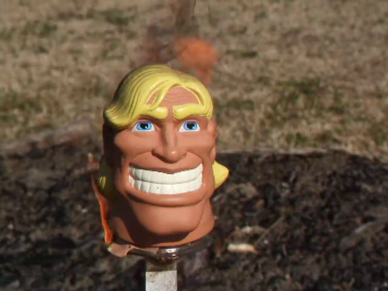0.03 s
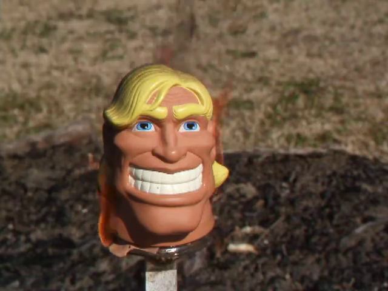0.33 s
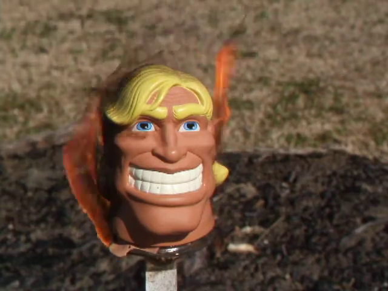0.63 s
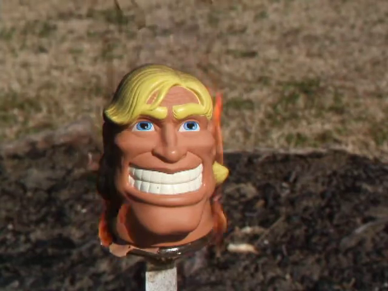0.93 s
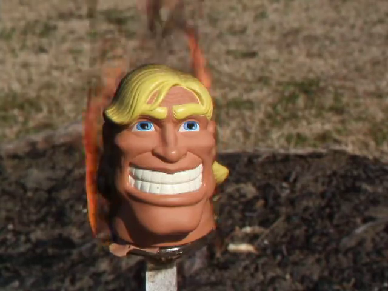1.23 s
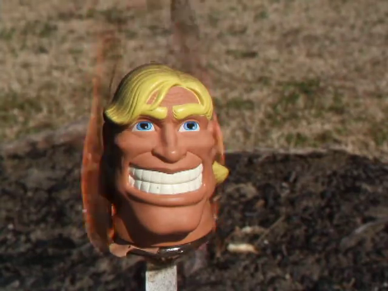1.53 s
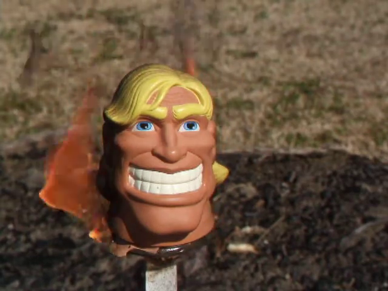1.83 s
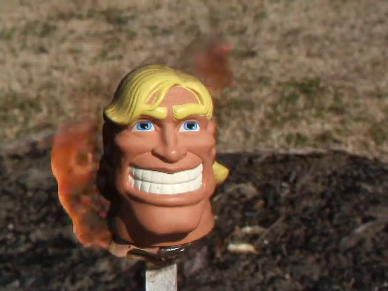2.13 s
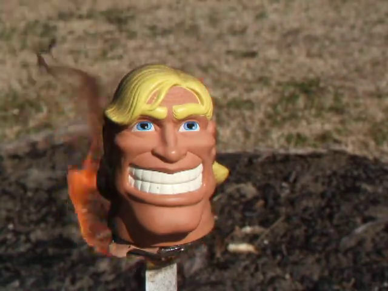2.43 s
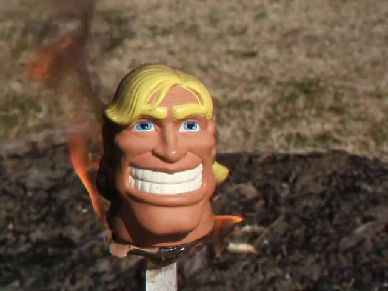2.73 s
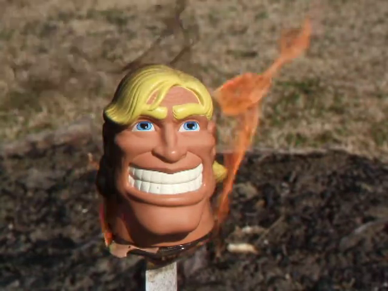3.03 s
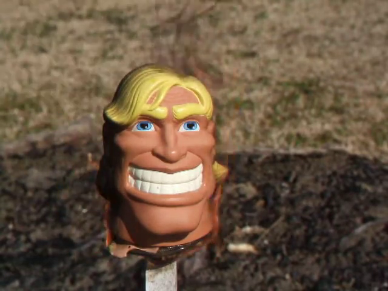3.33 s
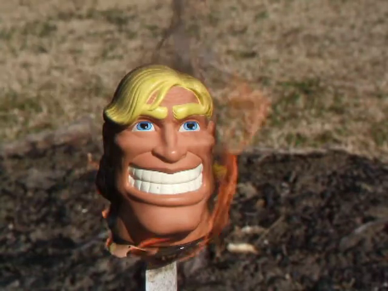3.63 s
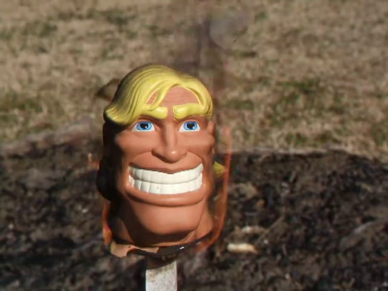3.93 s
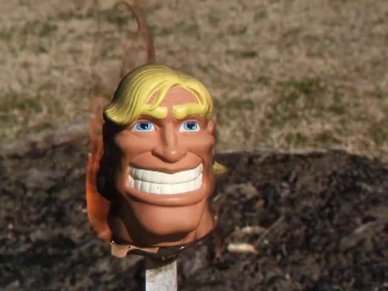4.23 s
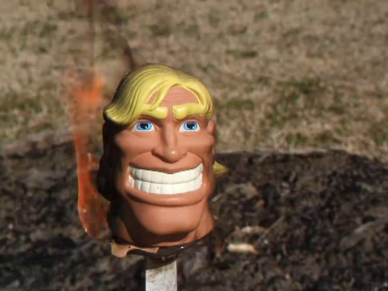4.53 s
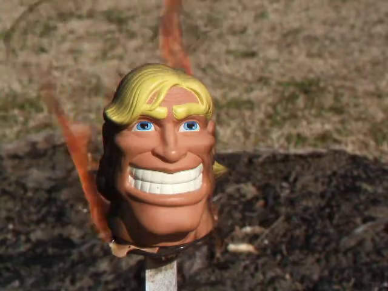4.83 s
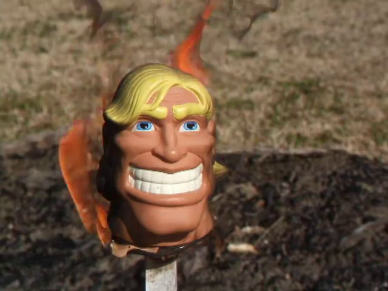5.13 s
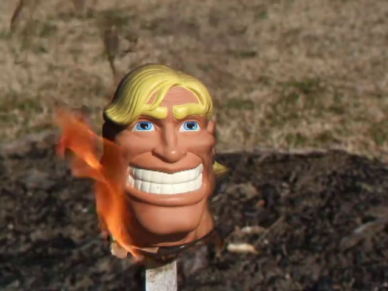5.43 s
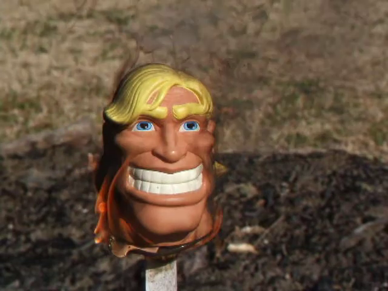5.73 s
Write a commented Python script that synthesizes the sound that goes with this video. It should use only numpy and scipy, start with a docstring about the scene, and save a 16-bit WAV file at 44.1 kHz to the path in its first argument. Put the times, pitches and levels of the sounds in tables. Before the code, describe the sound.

Burning plastic crackles finely outdoors, with irregular dry pops and brief sputters over a steady, slightly gritty hiss.

```python
"""A plastic head burning outdoors

The head burns on a post, close to a small camera whose coarse sampling adds grit. Gas bubbles burst
in the melt as dry pops over a fine crackle, and now and then the melt sputters and fizzes.
Behind it lie an open-air hiss, light wind, the drone of a far machine and a few faint chirps."""
import sys
import numpy as np
from scipy import signal
from scipy.fft import rfft, irfft
from scipy.io import wavfile
from scipy.ndimage import uniform_filter1d

SR = 44100
rng = np.random.default_rng(int(sys.argv[2]) if len(sys.argv) > 2 else 0)


def master(y):
    """Save y as 16-bit WAV."""
    cut = np.clip(np.atleast_2d(y).T, -1, 1)
    pcm = np.round(cut * 32767)  # scale
    wavfile.write(sys.argv[1], SR, pcm.astype(np.int16))


N = 263718
TIME = np.arange(N) / SR

# tone of the open air, a hiss over a low rumble: frequency_hz, relative_db
AIR_TONE = [(10, -9.5), (24, 0), (52, -.5), (80, -4), (135, -6.5), (200, -13), (310, -17), (460, -16),
            (620, -20), (1000, -19), (1600, -19.5), (2300, -22), (4000, -28), (8000, -33)]
# gusts of wind on the microphone: peak_s, half_width_s, level_db
WIND_GUSTS = [(1.705, 0.044, -41.5), (2.95, 0.19, -55.5)]
# steady notes of the far machine: pitch_hz, level_db
MACHINE_NOTES = [(119.3, -60.5), (180, -66), (221, -69.5), (238.5, -68), (274, -71), (360, -77),
                 (712.5, -71)]
# swells of one more machine note, the deepest: peak_s, half_width_s, level_db
MACHINE_SWELLS = [(1.0, .3, -55.5), (3.35, .2, -56.5)]
# faint chirps: start_s, length_s, start_pitch_hz, end_pitch_hz, peak_db
FAINT_CHIRPS = [(2.80, 0.038, 3450, 3940, -57.5), (5.12, .07, 3100, 2500, -58),
                (5.205, .04, 2530, 2490, -55.5)]
# tone of the sound bouncing off the hollow head and its post: frequency_hz, relative_db
ECHO_TONE = [(200, -3), (450, 4.5), (750, -3), (1000, 5.5), (1600, 7), (2500, -10), (3000, 6), (3400, -6),
             (4400, -1.5), (5050, 6.5), (5500, -7.5), (7000, 1.5)]
# tone of a bursting bubble: frequency_hz, relative_db
BUBBLE_TONE = [(100, -30.5), (400, -13.5), (1000, -9.5), (2000, -6), (3500, -1.5), (5000, 0.5), (7300, 4.5),
               (9000, 1.5)]
# tone of the dull knock a large bubble gives the head: frequency_hz, relative_db
KNOCK_TONE = [(80, -8), (250, -2), (500, 1.5), (900, -3.5), (1600, -8), (4000, -24.5)]
# the melt boils up and settles again: start_s, length_s, strength_db (compared with SIMMER_DB)
BOIL_UPS = [(0, .3, -54.5), (0.759, .22, -55), (1.279, .17, -52.5), (1.622, .2, -54), (2.031, .2, -56),
            (2.86, .34, -53), (3.33, .25, -47.5), (3.75, .18, -48.5), (3.94, .22, -43.5),
            (4.868, 0.08, -50.5), (5.435, .2, -52.5), (5.799, .12, -44)]
# quick runs of tiny bubbles, and a few very short dull ones that sound as single pops with body: start_s,
# length_s, level_db, extra_brightness_db_per_octave
SPUTTER_RUNS = [(0.564, 0.0022, -39.5, 0), (0.822, 0.0071, -34.5, 5.5), (0.896, 0.0048, -35.5, -4),
                (1.582, 0.013, -38.5, -4.5), (1.708, 0.0076, -38.5, -3.5), (1.772, 0.0047, -40.5, -8),
                (2.856, 0.0057, -22, 6), (3.127, 0.0054, -34, 2.5), (3.508, 0.055, -38.5, -1),
                (4.065, 0.01, -32.5, -1.5), (4.116, 0.065, -44.5, -.5), (5.429, 0.01, -44.5, -5.5),
                (5.834, 0.0058, -30.5, 5.5), (5.855, 0.029, -39.5, 0)]
# the loudest bursting bubbles: start_s, relative_db, brightness_db_per_octave
BIG_POPS = [(0.0124, -3.5, 2), (.081, -12, 9), (.147, -12, 10), (.3005, -8, 3.5), (.4807, -7.5, 5.5),
            (0.4913, -4, 4), (0.563, -5.5, 0.5), (0.6401, -5.5, 5), (0.9141, -3.5, 10),
            (0.9482, -10.5, 9.5), (0.9721, -8, 6), (1.126, -14.5, 5), (1.1612, -13, 1), (1.3628, -19, 7.5),
            (1.4838, -5.5, 3), (1.6662, -12, 2), (1.7039, -7.5, 6), (1.737, -12.5, 4), (1.7694, -1.5, 8),
            (1.927, -15, 4.5), (1.9777, -11.5, 11), (2.2115, -7.5, 2.5), (2.2159, -5, 6.5),
            (2.2344, -4.5, 3), (2.2894, -13.5, 17.5), (2.4685, -6.5, 8), (2.5209, 2.3, 3.5),
            (2.5785, -11.5, 6), (2.6269, -3.5, 8.5), (2.6849, -6, 7), (2.8774, -5, 3.5),
            (2.8952, -8.5, 6.5), (2.9837, -7.5, 7.5), (3.131, -8.5, 7), (3.2133, -16, 6.5),
            (3.2932, -11.2, 3),         (3.3743, -12, 5), (3.4219, -12, 5), (3.5728, -7, 4),
            (3.6008, -9.5, 3), (3.6732, -15, -1), (3.6839, -12, 9), (3.6941, -9.5, 5), (3.7472, 0.6, 5),
            (3.7832, -7.5, 5.5), (3.8027, -9, 3.5), (3.8414, -8, 9), (3.87, -1, 5.5), (3.927, -8.5, 8),
            (3.949, -6, 5.5), (3.9989, -9, 1.5), (4.026, -5, 9.5), (4.183, -16, -0.5), (4.247, -16.5, -1.5),
            (4.373, -6.5, 4), (4.3992, -9.5, 0.5), (4.4476, -3, 4), (4.5493, -9, 6.5), (4.5872, -6.5, 7.5),
            (4.6255, -10, 7.5), (4.739, -11.5, 3.5), (4.9199, -10.5, 8), (5.0916, 7, 8.5),
            (5.1022, -1.5, 3), (5.2717, -9, 10), (5.4067, -9, 2), (5.5246, -11, 2.5), (5.6212, -10, 1.5),
            (5.704, -7, 7), (5.747, -2, 6), (5.7709, .1, 5), (5.8005, -9.5, 1.5), (5.8375, -1.5, 5.5)]

SIMMER_DB = -56.5  # rough level of the crackle between boil-ups


def undb(db):
    """Turn decibels into a number to multiply by."""
    return 10 ** (np.asarray(db) / 20)


def unit(x):
    """Scale a sound so its average level (rms) is 1."""
    return x / np.sqrt(np.mean(x ** 2) + 1e-18)


def add(out, start_s, sound):
    """Mix a sound in at the given time."""
    i = max(int(round(start_s * SR)), 0)
    out[i:i + len(sound)] += sound[:max(N - i, 0)]


def wander(per_s):
    """A smooth random curve that strays about 1 either side of zero."""
    hold = int(SR / per_s)
    steps = np.repeat(rng.standard_normal(N // hold + 1), hold)
    return 1.3 * uniform_filter1d(uniform_filter1d(steps, hold), hold)[:N]


def swells(rows, rest_db):
    """A volume that rests at one level and rises in bell-shaped swells."""
    return undb(rest_db) + sum(undb(db) * np.exp(-((TIME - s) / width) ** 2) for s, width, db in rows)


def tone_filter(points, tilt_db=0, size=256):
    """Make a filter from a tone table; tilt_db brightens it per octave, pivoting at 5 kHz."""
    hz, db = np.transpose(points)
    octave = np.log2(np.maximum(np.fft.rfftfreq(size, 1 / SR), 10))
    db = np.interp(octave, np.log2(hz), db) + tilt_db * np.clip(octave - np.log2(5000), -3, 1)
    # move the filter's energy to its start, so clicks begin sharply
    cepstrum = irfft(np.log(undb(db)))
    cepstrum[1:size // 2] *= 2
    cepstrum[size // 2 + 1:] = 0
    return irfft(np.exp(rfft(cepstrum)))


def through(x, impulse):
    """Pass a sound through a filter, keeping its length."""
    return signal.oaconvolve(x, impulse)[:len(x)]


def air_and_wind(hiss_db=-49.5, swell_db=1.0, flicker_db=.98, breeze_db=-66):
    """The open air hisses almost evenly, and wind rumbles on the microphone."""
    hiss = unit(through(rng.standard_normal(N), tone_filter(AIR_TONE, size=8192)))
    low_band = signal.butter(2, [28, 75], "band", fs=SR, output="sos")
    wind = unit(signal.sosfilt(low_band, rng.standard_normal(N)))
    hiss_gain = undb(hiss_db + swell_db * wander(1.8) + flicker_db * wander(18))
    return hiss * hiss_gain + wind * swells(WIND_GUSTS, breeze_db)


def far_machine(waver_db=2.0, drift=.006, deep_hz=89.76, deep_rest_db=-63.5, deep_waver_db=1.4):
    """A far drone wavers on its way through moving air; its deepest note swells now and then."""
    def note(pitch_hz):
        hz = pitch_hz * (1 + drift * wander(6))
        return np.sqrt(2) * np.sin(2 * np.pi * np.cumsum(hz) / SR)
    steady = sum(note(hz) * undb(db + waver_db * wander(5)) for hz, db in MACHINE_NOTES)
    deep = note(deep_hz) * swells(MACHINE_SWELLS, deep_rest_db) * undb(deep_waver_db * wander(5))
    return steady + deep


def chirps():
    """Thin whistles slide in pitch, fading softly in and out."""
    out = np.zeros(N)
    for start_s, length_s, start_hz, end_hz, db in FAINT_CHIRPS:
        hz = np.linspace(start_hz, end_hz, int(length_s * SR))
        whistle = np.sin(2 * np.pi * np.cumsum(hz) / SR)
        add(out, start_s, undb(db) * signal.windows.tukey(len(hz), .5) * whistle)
    return out


def echoing_click(scatter_db=-10, scatter_s=.0018, ground_s=.0052, ground_db=-21,
                  tail_db=-21, tail_s=.0072):
    """A click arrives directly, then bounces off the head and the ground and leaves a faint tail."""
    t = TIME[:SR // 20]
    scatter = rng.standard_normal(len(t)) * np.exp(-t / scatter_s) * (t > .0009)
    tail = rng.standard_normal(len(t)) * np.exp(-t / tail_s) * (t > ground_s)
    echo = undb(scatter_db) * scatter / np.linalg.norm(scatter)
    echo += undb(tail_db) * tail / np.linalg.norm(tail)
    echo += undb(ground_db) * np.sinc((t - ground_s) * SR)
    return signal.unit_impulse(len(t)) + through(echo, tone_filter(ECHO_TONE, size=512))


def burst(tilt_db):
    """One bubble bursts with a sharp click, with the echoes of its own spot on the melt."""
    return through(echoing_click(), tone_filter(BUBBLE_TONE, tilt_db))


def bubbles(samples, per_s, spread_db, tilt_db, spots):
    """Bubbles burst at random moments on several spots: many small ones, a few large."""
    out = np.zeros(samples)
    for _ in range(spots):
        hits = rng.random(samples) < per_s / spots / SR
        strength = undb(spread_db * np.minimum(rng.standard_exponential(samples), 3))
        out += through(hits * strength, burst(tilt_db))
    return unit(out)


def boiling(rise_s=.06, fall_s=.025):
    """How hard the melt boils, 1 at a simmer: each boil-up builds, holds and dies quickly."""
    power = np.ones(N)
    for start_s, length_s, db in BOIL_UPS:
        rise = np.clip((TIME - start_s) / rise_s, 0, 1)
        fall = np.exp(-np.maximum(TIME - start_s - length_s, 0) / fall_s)
        power += (undb(db - SIMMER_DB) * rise * fall) ** 2
    return np.sqrt(power)


def crackle(heat, dull_db=-9.5, flicker_db=3.3, growth=.9):
    """The boiling melt crackles finely all the time, in uneven spurts as the flames lick it."""
    bright = bubbles(N, per_s=340, spread_db=6.3, tilt_db=0, spots=6)
    dull = bubbles(N, per_s=110, spread_db=4, tilt_db=-5.5, spots=4)
    gain = heat ** growth * undb(SIMMER_DB + flicker_db * wander(35))
    return gain * (bright + undb(dull_db) * dull)


def ticks(heat, simmer_per_s=6, crowding=1.5, base_db=-21, spread_db=1.7, growth=.72,
          tilt_db=-1.0, tilt_spread_db=1.87, max_count=400):
    """Medium bubbles burst at random; the harder the melt boils, the more and the louder they are."""
    out = np.zeros(N)
    expected_so_far = np.cumsum(simmer_per_s * heat ** crowding) / SR
    traits = rng.standard_normal((max_count, 2))
    due = np.arange(max_count) + rng.random(max_count)  # each bursts when the tally reaches its number
    for i, (size, brightness) in zip(np.searchsorted(expected_so_far, due), traits):
        if i < N:
            gain = undb(base_db + spread_db * size) * heat[i] ** growth
            add(out, TIME[i], gain * burst(tilt_db + tilt_spread_db * brightness))
    return out


def sputters(fade_db=6):
    """The melt spits short runs of tightly packed bubbles that weaken as the gas runs out."""
    out = np.zeros(N)
    for start_s, length_s, db, tilt_db in SPUTTER_RUNS:
        run = bubbles(int(length_s * SR), per_s=3400, spread_db=3.0, tilt_db=tilt_db, spots=2)
        fade = undb(np.linspace(0, -fade_db, len(run)))
        add(out, start_s, undb(db) * unit(run * fade))
    return out


def pops(gain_db=-1, knock_db=-15.5, usual_tilt_db=5):
    """Each large bubble gives one sharp snap and knocks on the head; smaller skins sound brighter."""
    out = np.zeros(N)
    for start_s, db, tilt_db in BIG_POPS:
        knock = undb(knock_db) * through(echoing_click(), tone_filter(KNOCK_TONE))
        snap = burst(tilt_db - usual_tilt_db)
        add(out, start_s, undb(db + gain_db) * (snap + knock))
    return out


def scene():
    """The burning plastic in front of its quiet background, in one channel."""
    heat = boiling()
    fire = pops() + sputters() + ticks(heat) + crackle(heat)
    return (fire + air_and_wind() + far_machine() + chirps())[None]


def record(dry, camera_rate_hz=16000, step=.0055, top_hz=8800):
    """The camera samples slowly and in coarse steps, which cuts the top treble and adds a gritty hiss."""
    sampled = signal.resample_poly(dry, camera_rate_hz, SR, axis=-1)
    stepped = step * np.floor(sampled / step)
    played = signal.resample_poly(stepped, SR, camera_rate_hz, axis=-1)[:, :N]
    low_pass = signal.firwin(161, top_hz, window=("kaiser", 8), fs=SR)
    return signal.convolve(played, low_pass[None], mode="same")


dry = scene()
out = record(dry)
master(out)
```